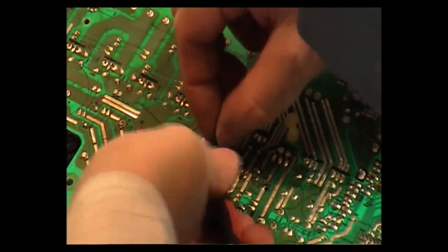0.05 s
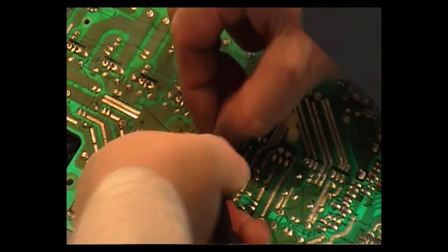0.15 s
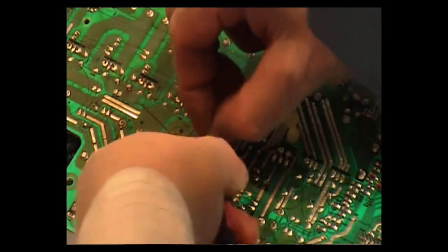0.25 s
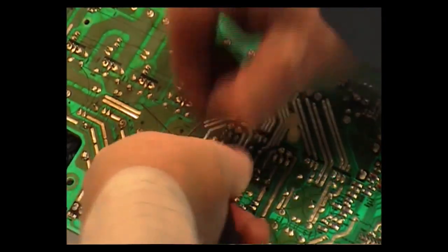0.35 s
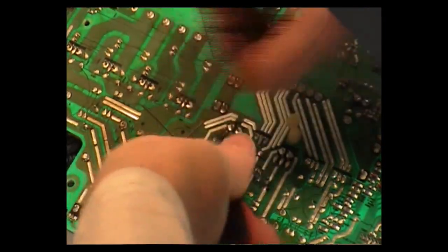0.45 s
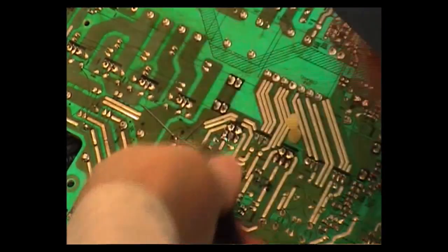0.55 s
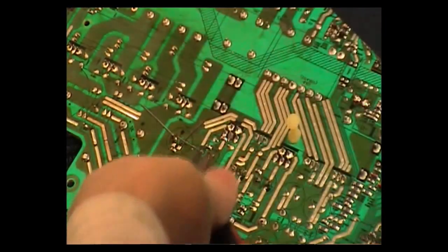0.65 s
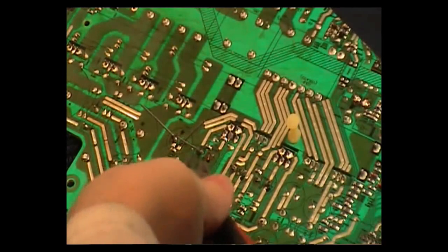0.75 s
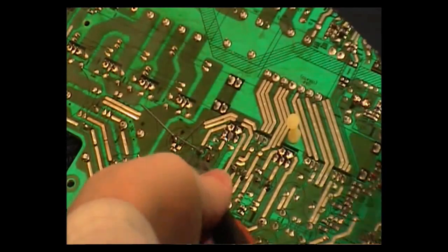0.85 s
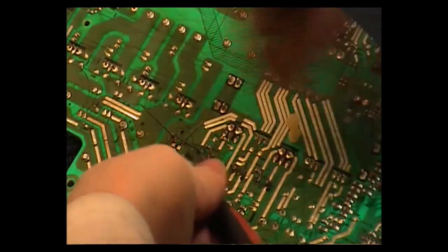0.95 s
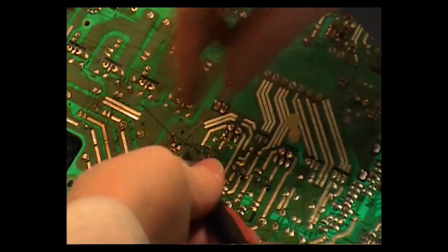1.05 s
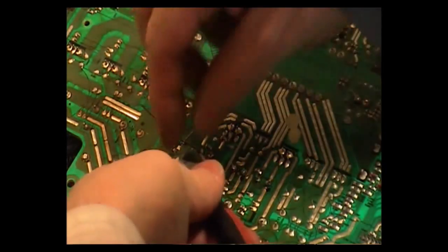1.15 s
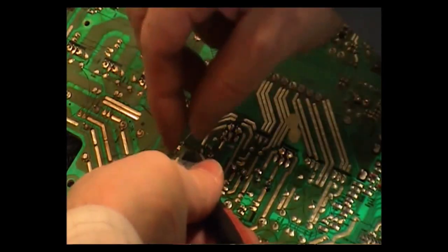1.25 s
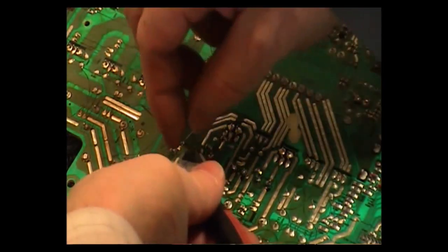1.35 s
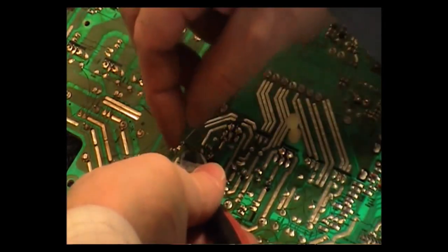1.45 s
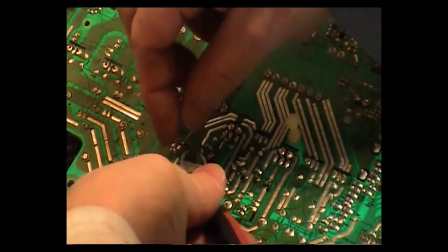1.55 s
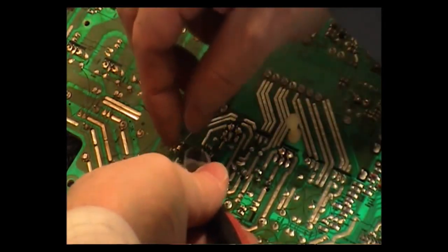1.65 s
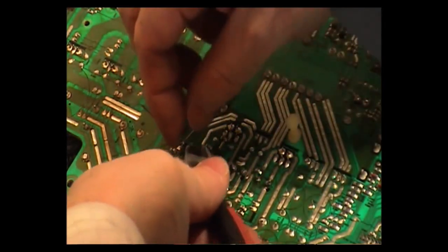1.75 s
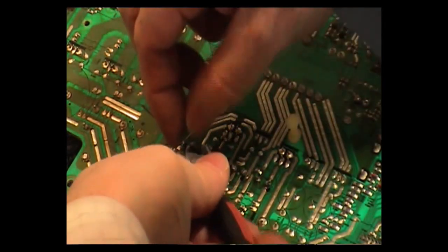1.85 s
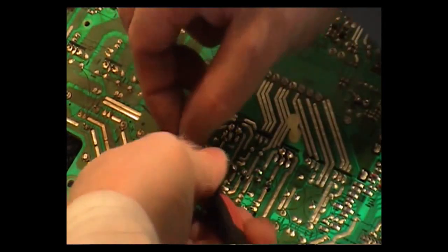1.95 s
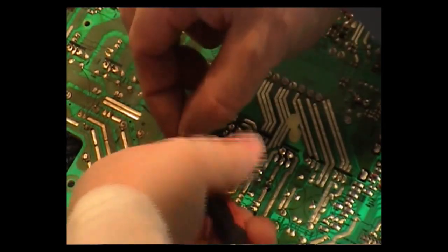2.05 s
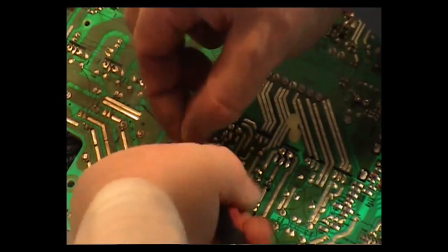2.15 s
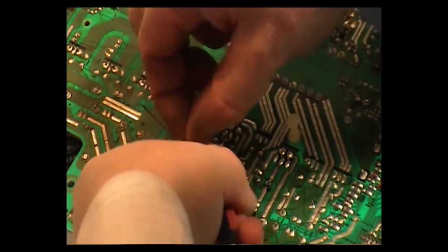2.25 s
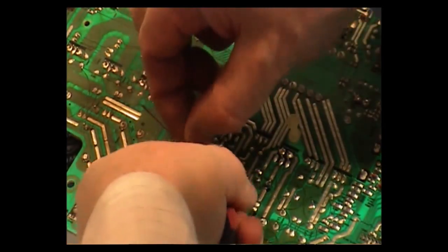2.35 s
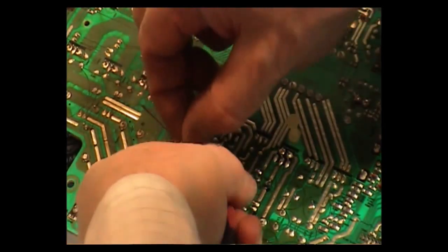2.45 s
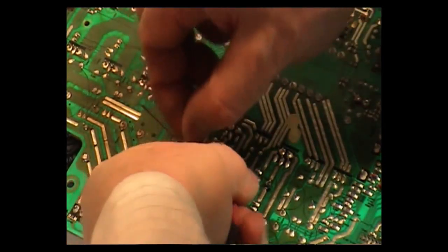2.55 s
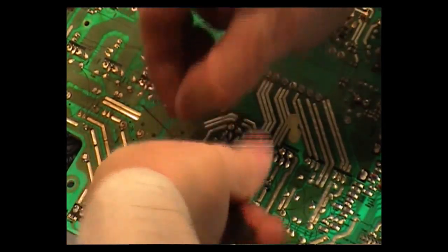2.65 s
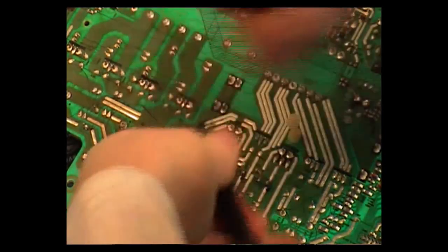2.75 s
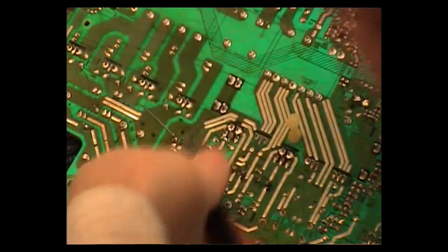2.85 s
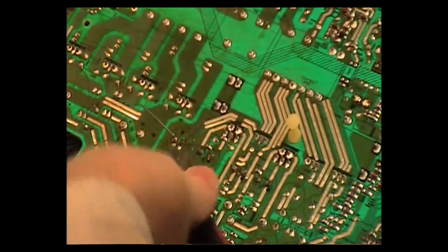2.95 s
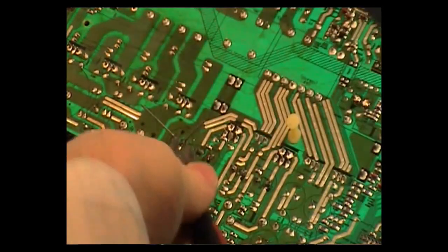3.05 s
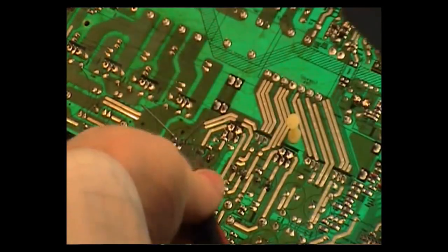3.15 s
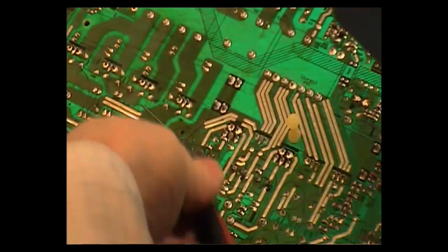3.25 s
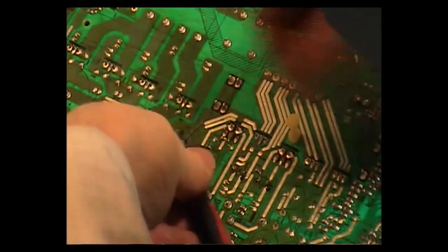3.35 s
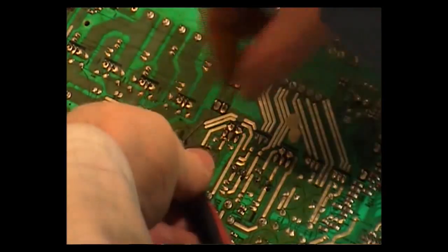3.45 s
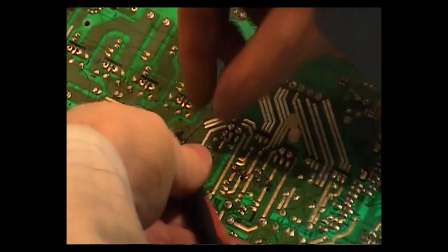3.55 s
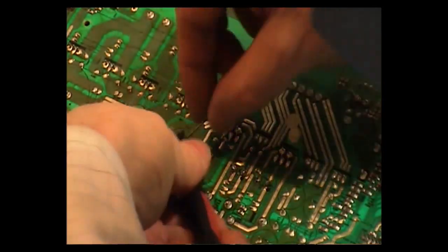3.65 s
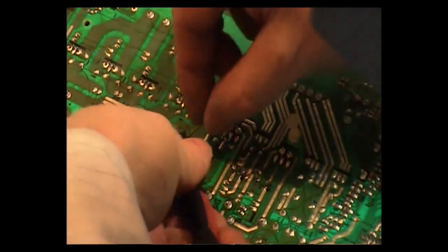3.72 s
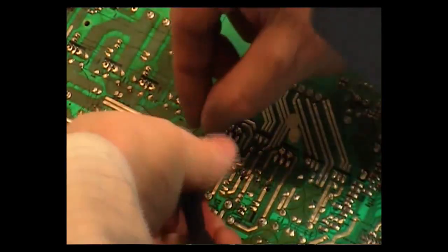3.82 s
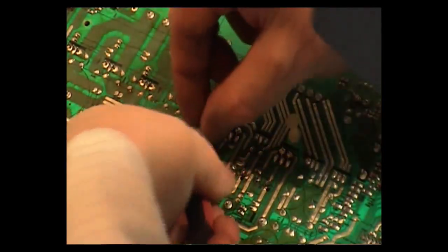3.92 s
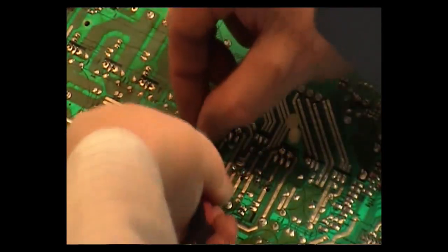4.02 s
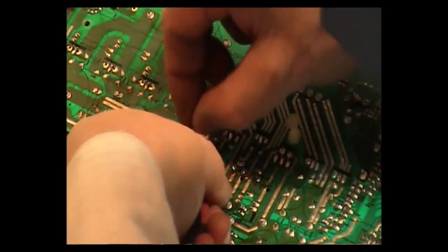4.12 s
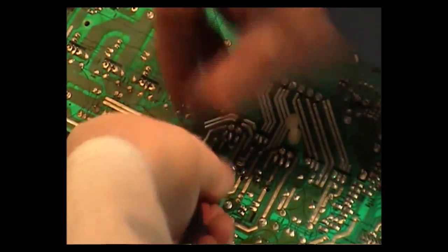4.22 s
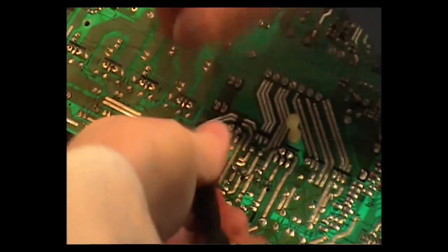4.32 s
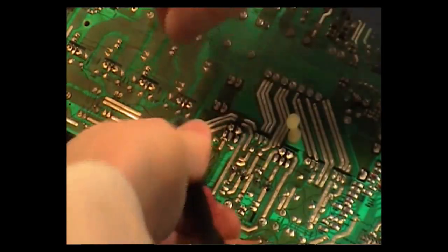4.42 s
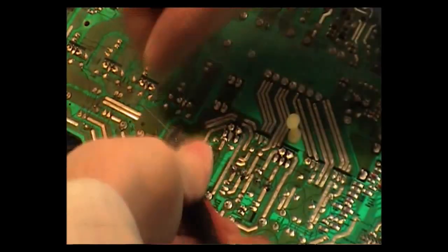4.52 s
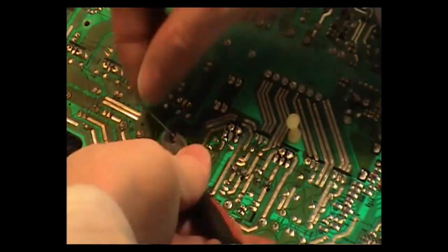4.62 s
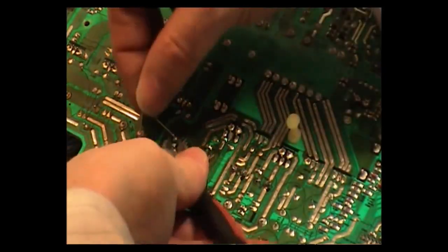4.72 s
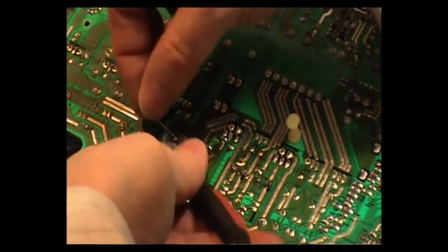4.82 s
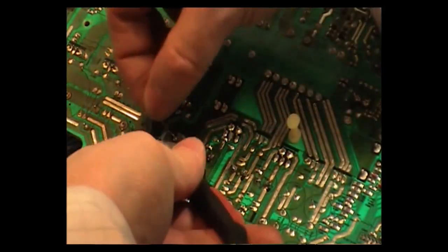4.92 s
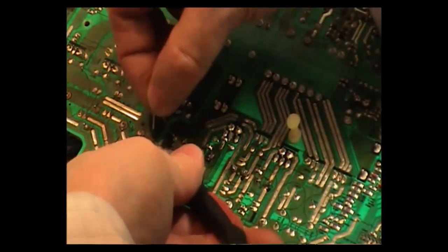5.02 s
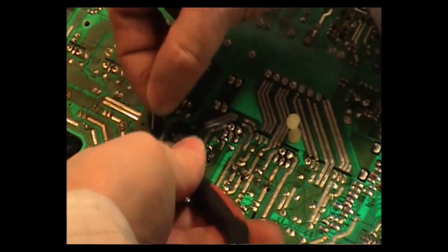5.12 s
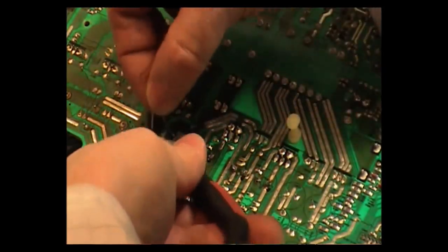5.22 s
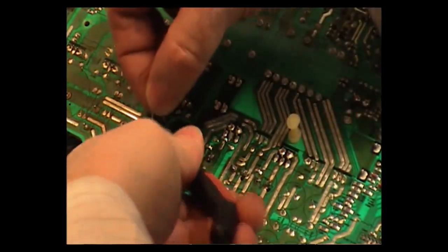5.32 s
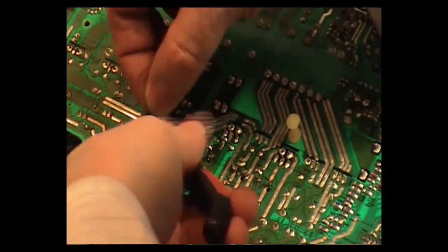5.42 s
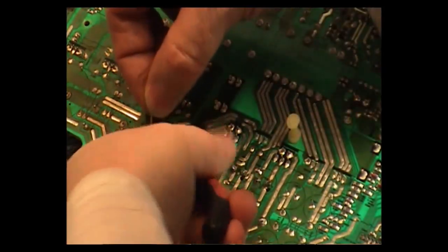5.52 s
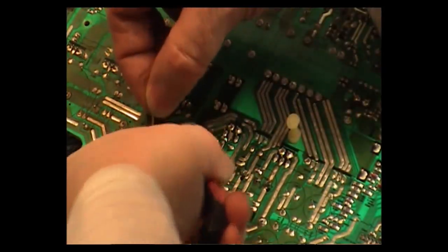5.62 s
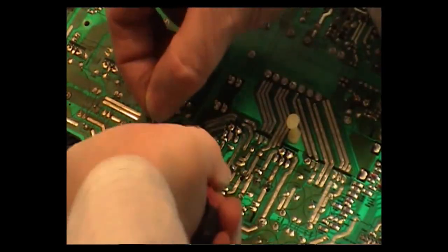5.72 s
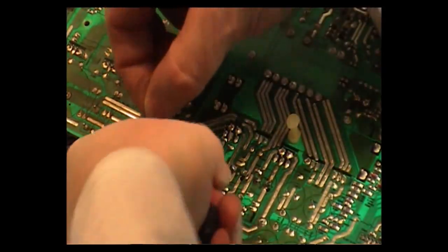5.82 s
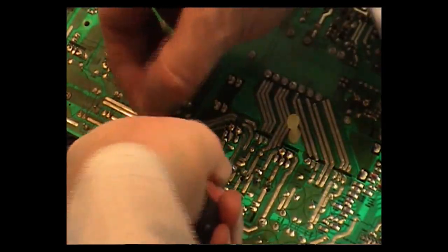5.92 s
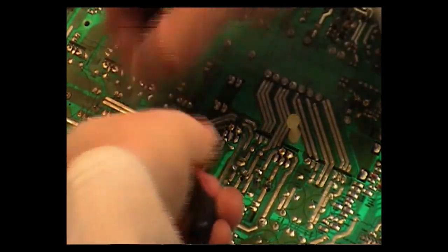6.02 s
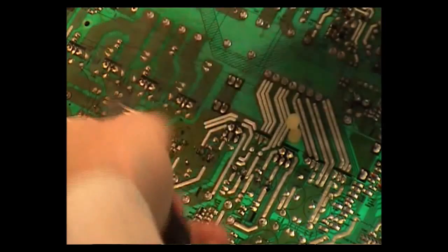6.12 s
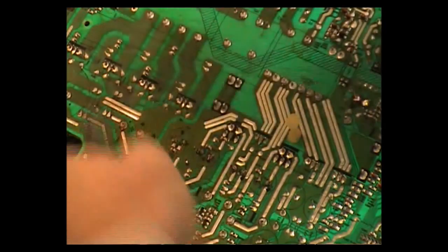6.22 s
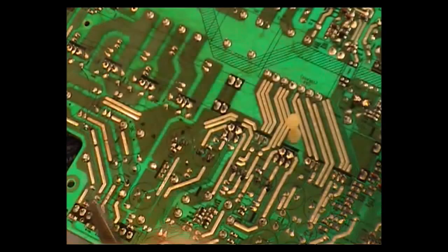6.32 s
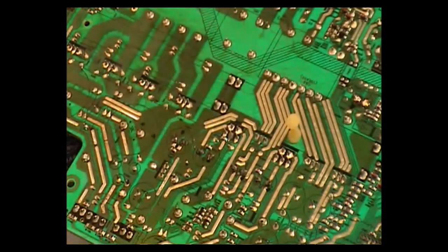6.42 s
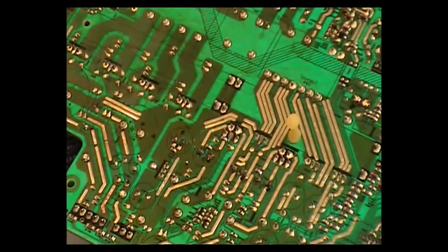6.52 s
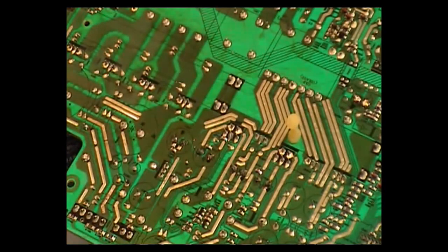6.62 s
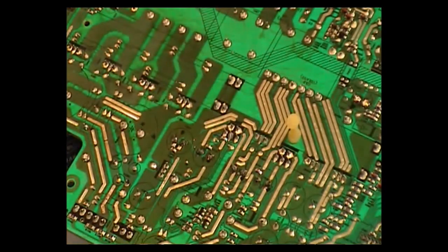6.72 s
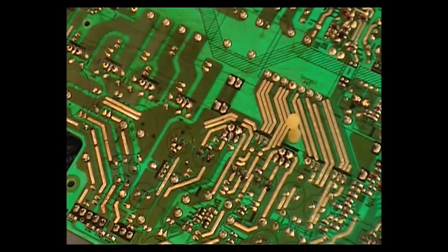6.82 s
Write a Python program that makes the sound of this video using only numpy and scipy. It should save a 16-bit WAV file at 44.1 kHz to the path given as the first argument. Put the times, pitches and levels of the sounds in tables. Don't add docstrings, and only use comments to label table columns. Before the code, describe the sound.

Irregular steel snips and plasticky board knocks sound very near the microphone, with short room reflections. Small ticks and finger taps fill the gaps between a few hard slams and two explosive metallic cracks, one before three seconds and one around six. Afterwards hands brush the board and something squeaks briefly. Low far traffic with a falling engine tone and faint camera hiss lie underneath.

```python
import sys
import numpy as np
from scipy import signal
from scipy.fft import rfft, irfft, next_fast_len
from scipy.io import wavfile
from scipy.ndimage import uniform_filter1d, map_coordinates

SR = 44100
rng = np.random.default_rng(int(sys.argv[2]) if len(sys.argv) > 2 else 0)


def generate_wav(signal):
    frames = np.transpose(np.atleast_2d(signal))
    scaled = np.clip(frames, -1, 1) * 32767
    pcm = np.round(scaled).astype(np.int16)
    wavfile.write(sys.argv[1], SR, pcm)


def volts_from_decibels(level):
    exponent = np.asarray(level, float) / 20
    return 10 ** exponent


N = 302945
SIZE = 5 * 2 ** 12
LEAD = 512
JAW_HZ = 7800
BLUNT_TOP_DB = -11

# start_s, click_db, board_db, tool_db, top_band_db
CUTS = [
    (2.726, -4.5, -30, -27.5, 7),
    (6.0598, -3, -22.5, -24, 0.5),
]
CUT_ROOM_DB = [8, 3]


def cuts():
    s, click, board, tool, top = np.transpose(CUTS)
    table = rows(s, click, board, tool, 7720, 1250, CUT_ROOM_DB, top)
    return contacts(table, bite=.0005, rattle=.004, rattle_db=-15, snap=6)


# start_s, click_db, board_db, tool_db, click_hz
SNIPS = [
    (2.0206, -22.5, -63, -41.5, 6670),
    (2.364, -21.5, -49, -46, 8160),
    (3.6379, -16.5, -49.5, -35, 10500),
    (4.0103, -15.5, -63, -38, 5700),
]


def snips():
    s, click, board, tool, hz = np.transpose(SNIPS)
    table = rows(s, click, board, tool, hz, 990, room_db=0.3, top_db=0.5)
    return contacts(table, bite=0.00028, rattle=0.0048, rattle_db=12.0)


# start_s, board_db, board_hz, click_db, tool_db
SLAMS = [
    (0.4964, -19, 950, -25.5, -33),
    (0.503, -26, 1100, -45, -41),
    (3.7237, -37.5, 1050, -28.5, -39),
    (4.3413, -20, 900, -13, -26),
]


def slams():
    s, board, hz, click, tool = np.transpose(SLAMS)
    top_db = 10.5 + 0.95 * click
    table = rows(s, click, board, tool, JAW_HZ, hz, room_db=-4, top_db=top_db)
    return contacts(table, bite=0.0011, rattle=0.0092, rattle_db=-3.5, snap=4.3, steel_db=-10)


# start_s, click_db, tool_db, click_hz
BOUNCES = [
    (1.2724, -20, -36, 8850),
    (1.2792, -20, -31.5, 7800),
    (1.2838, -22, -34, 7600),
    (1.299, -25.5, -35.5, 4940),
    (1.318, -32, -44, 5400),
    (1.336, -39, -50, 5450),
    (1.362, -42, -58, 8000),
]


def bounces():
    return light_steel(BOUNCES, board_db=-40.5, room_db=0, top_db=-11, rattle=.0022)


# start_s,
# click_db, tool_db, click_hz
TICKS = [(0.1211, -40.5, -75, 7900), (0.1885, -47.5, -74, 7500), (0.319, -65, -59.5, 5000),
         (0.466, -63, -56.5, 5000), (0.667, -43, -70, 8000), (0.6862, -35, -45.5, 10500),
         (0.711, -44, -68, 7900), (0.7204, -38, -61, 7550), (0.7332, -34.5, -47, 8200),
         (1.201, -42, -67, 9770), (1.2135, -43, -71, 7800), (1.3557, -40, -62, 4650),
         (1.3844, -58, -70, 9000), (1.405, -41, -68, 8000), (1.6057, -42.5, -52, 6640),
         (1.7335, -36.5, -43.5, 6500), (1.783, -45, -72, 9900), (1.806, -36.5, -46, 6900),
         (1.8257, -34.5, -65, 6440), (1.8951, -46, -45.5, 6200), (1.9185, -41.5, -71, 7500),
         (1.954, -45, -47, 6400), (2.009, -60, -57, 4500), (2.9664, -36, -42, 9200),
         (3.0077, -43.5, -72, 4800), (3.642, -24, -41, 6100), (3.6674, -30.5, -52, 6960),
         (4.0019, -30, -42, 5500), (4.12, -30, -48, 5760), (4.1895, -41.5, -60, 5740),
         (4.4376, -38, -65, 8100), (4.4852, -40, -48, 8000), (4.5144, -35, -50, 7000),
         (4.5513, -35, -52.5, 7600), (4.7165, -56, -59, 8070), (4.7643, -44, -60, 8500),
         (4.795, -42, -62, 7500), (4.583, -24, -43.5, 8000), (5.379, -64, -66, 7490),
         (6.065, -12, -25, 9500), (6.0718, -20, -46, 9100), (6.3694, -53, -60, 4540),
         (6.8384, -54.5, -73, 7330)]


def ticks():
    return light_steel(TICKS, board_db=-54, room_db=-1, top_db=-9, rattle=.007)


def light_steel(table, board_db, room_db, top_db, rattle):
    s, click, tool, hz = np.transpose(table)
    board = board_db + 0.28 * click
    full = rows(s, click, board, tool, hz, 950, room_db, top_db)
    return contacts(full, bite=0.00012, rattle=rattle, rattle_db=-2, snap=4.5, steel_db=-2)


# start_s, board_db, board_hz, click_db
KNOCKS = [(0.082, -49.5, 580, -45.5), (0.115, -49, 990, -57), (0.6465, -44.5, 674, -44),
          (0.6799, -44, 800, -52), (0.687, -43, 954, -44), (1.043, -45, 523, -49),
          (1.142, -48.5, 910, -42.5), (1.4043, -46, 960, -56), (2.2316, -44.5, 547, -49),
          (2.5533, -45.5, 607, -55), (2.8866, -41.5, 880, -62), (2.9538, -43.5, 600, -58),
          (3.7961, -39.5, 936, -31.5), (4.4929, -45.5, 670, -50), (4.5293, -47.5, 1010, -39),
          (4.84, -41.5, 630, -46), (4.8647, -47, 950, -43.5), (5.1052, -53, 940, -43),
          (5.2499, -40, 1080, -37.5), (5.4515, -54.5, 944, -48), (5.5183, -49, 943, -42.5),
          (6.765, -53, 960, -47)]


def knocks():
    s, board, hz, click = np.transpose(KNOCKS)
    tool = 1.322 * board + 6
    return blunt(rows(s, click, board, tool, JAW_HZ, hz, room_db=0, top_db=BLUNT_TOP_DB))


# start_s, board_db, board_hz
TAPS = [(0.2139, -53.5, 684), (0.2744, -58, 432), (0.4344, -69, 676), (0.6364, -50, 370),
        (0.6545, -45, 676), (0.6614, -45, 560), (1.2144, -41.5, 846), (1.5564, -60, 740), (1.919, -53, 990),
        (2.085, -55.5, 1100), (2.4261, -45.5, 560), (2.4594, -46, 563), (2.6562, -51, 318),
        (3.4876, -51.5, 1695), (3.5504, -49.5, 516), (3.719, -37, 1010), (3.9524, -55, 646),
        (4.9214, -54, 301), (5.3761, -60, 318), (5.9429, -42.5, 620), (5.9772, -42.5, 606),
        (6.274, -42.5, 580), (6.297, -48, 1300), (6.33, -53.5, 800)]


def taps():
    s, board, hz = np.transpose(TAPS)
    return blunt(rows(s, board - 23, board, board - 11.5, JAW_HZ, hz, room_db=0, top_db=BLUNT_TOP_DB))


def blunt(table):
    return contacts(table, bite=0.00069, rattle=0.0079, rattle_db=-2.5, snap=4.1)


def rows(s, click_db, board_db, tool_db, click_hz, board_hz, room_db, top_db):
    columns = s, click_db, board_db, tool_db, click_hz, board_hz, room_db, top_db
    return np.transpose(np.broadcast_arrays(*columns))


# centre_hz, width_hz, level_db
BOARD = [(211, 65, -19.5), (301, 35, -0.5), (499, 80, 2), (626.3, 40.2, 1.5), (775, 87, -1),
         (859, 80, -1.5), (1010, 140, 3), (1169, 61, 4.5), (1432, 140, 1.5), (1730, 52, 1),
         (2223, 200, -9.5)]
TOOL = [(1950, 460, -2.5), (2400, 149.7, 1.5), (2870, 550, 3), (3254, 190, 3), (3850, 510, 4),
        (4430, 120, 2)]
JAWS = [(4650, 710, -2), (6760, 830, -2.5), (7600, 1300, -2.5), (9780, 3350, -1), (12400, 5100, -1),
        (13600, 2000, -1.5), (15800, 2200, -18)]
# delay_s, level_db
ECHOES = [(.00053, -3), (.0032, -14), (.009, -20)]


def contacts(table, bite, rattle, rattle_db, snap=0, steel_db=0):
    out = np.zeros((2, N + SIZE))
    hz, t = np.fft.rfftfreq(SIZE, 1 / SR), np.arange(2048) / SR
    board, tool, jaws = modes(BOARD, hz), modes(TOOL, hz), modes(JAWS, hz)
    echoes = 1 + sum(volts_from_decibels(db) * np.exp(-2j * np.pi * hz * s) for s, db in ECHOES)
    rattle_s = rattle + np.array([[.004], [.0015], [0]])
    rattle_gain = volts_from_decibels(rattle_db + steel_db * np.array([[0], [.5], [1]]))
    force = np.exp(-t / bite) + rattle_gain * np.exp(-t / rattle_s)
    for s, click_db, board_db, tool_db, click_hz, board_hz, room_db, top_db in table:
        chatter = rfft(rng.standard_normal(force.shape) * force + snap * (t == 0), SIZE)
        edge = modes([(click_hz, 0.61 * click_hz, 0)], hz) ** 2 + volts_from_decibels(0.778 * click_db - 7.0)
        spot = modes([(board_hz, 1.0 * board_hz, 0)], hz) ** 2 + volts_from_decibels(0.29 * board_db + 6.5)
        parts = [volts_from_decibels(board_db + 25.0) * struck(board * spot, chatter[0], scatter_db=3.0, blur=16),
                 volts_from_decibels(tool_db + 21.0) * struck(tool, chatter[1], scatter_db=3.0, blur=60),
                 volts_from_decibels(click_db + 10.0) * struck(jaws * edge, chatter[2] * echoes, scatter_db=0.0, blur=190)]
        parts = parts * volts_from_decibels(top_db / (1 + (12000 / (hz + 1)) ** 10))
        straight = sum(part[0] for part in parts)
        blended = np.sqrt(sum(np.abs(part[1]) ** 2 for part in parts))
        out[:, round(s * SR):][:, :SIZE] += heard(straight, volts_from_decibels(room_db) * blended, hz)
    return out[:, LEAD:N + LEAD]


def modes(table, hz):
    return np.array([(-1) ** k * volts_from_decibels(db) * 1j * hz * w / (c * c - hz * hz + 1j * hz * w)
                     for k, (c, w, db) in enumerate(table)])


def struck(shapes, force, scatter_db, blur):
    shapes = shapes * volts_from_decibels(rng.normal(0, scatter_db, (len(shapes), 1)))
    blend = uniform_filter1d(np.sum(np.abs(shapes) ** 2, axis=0), size=blur)
    return np.array([unit(force * shapes.sum(0)), unit(np.sqrt(np.abs(blend)))])


# freq_hz, side_over_mid_db
WIDTH_DIRECT = [(60, -15.5), (110, -22.5), (200, -13), (380, -30.5), (700, -25), (1290, -23), (2380, -11),
                (4400, -10), (8120, -9.5), (15000, 6.5)]


def heard(straight, blended, hz):
    ports = 1 + 1j * volts_from_decibels(along(WIDTH_DIRECT, hz)) * np.array([[1], [-1]])
    path_s = .0006
    late = np.exp(-2j * np.pi * hz * (LEAD / SR + path_s))
    return irfft((straight * ports + blended * room_tail(hz)) * late, SIZE)


# freq_hz, t60_s
ROOM = [(200, 0.36), (1000, 0.26), (4000, 0.36), (8000, 0.32), (14000, 0.21)]
# freq_hz, level_db
ROOM_GAIN = [(300, 2.5), (1000, -2.5), (3500, -1), (8000, -6.5), (14000, -10.5)]
# freq_hz, side_over_mid_db
WIDTH_ROOM = [(60, -13.5), (110, -18.5), (200, -25), (380, -29.5), (700, -21.5), (1290, -17.5),
              (2380, -7.5), (4400, -4), (8120, -5), (15000, 12)]


def room_tail(hz):
    length = SIZE - 4096
    f, t, z = signal.stft(rng.standard_normal((2, length)), SR, nperseg=256)
    decay = volts_from_decibels(-60 * t / along(ROOM, f)[:, None]) * (1 - np.exp(-t / 0.011))
    decay = decay / np.linalg.norm(decay, axis=1, keepdims=True)
    tail = signal.istft(z * decay, SR, nperseg=256)[1][:, :length]
    mid, side = rfft(tail / np.linalg.norm(tail[0]), SIZE) * volts_from_decibels(along(ROOM_GAIN, hz))
    side = side * volts_from_decibels(along(WIDTH_ROOM, hz))
    return np.array([mid + side, mid - side])


def singing():
    dry = (ringing() + creak()) * volts_from_decibels(1.5 * wobble(150))
    tail = irfft(room_tail(np.fft.rfftfreq(SIZE, 1 / SR)), SIZE)
    return dry + volts_from_decibels(-10) * signal.fftconvolve(dry[None], tail, axes=1)[:, :N]


# start_s, pitch_hz,
# level_db, t60_s
RINGS = [(.083, 2163, -48, 0.081), (2.75, 4360, -44, .45), (1.919, 8200, -50, .04),
         (1.2155, 1000, -38, .05), (5.2505, 1100, -43, .08), (5.2505, 3650, -48, .04),
         (2.7265, 7550, 1.5, .006), (2.7293, 7900, -9, 0.011), (6.0605, 7700, -7, .008),
         (4.342, 993, -23, .14), (0.497, 1000, -22, .03), (0.6548, 640, -33, .03), (0.6615, 600, -35, .03),
         (0.6795, 850, -37, .03), (6.6, 4050, -49, 0.36), (.503, 1170, -26, 0.24), (2.732, 1172, -29, 0.32),
         (3.729, 1171, -49, 0.24), (6.066, 1000, -29.5, 0.31), (6.07, 484.3, -31, 0.24),
         (0.6385, 3700, -45, .03), (0.687, 4120, -41, .04), (4.5515, 3800, -40, 0.042),
         (1.273, 3600, -33, 0.077), (1.319, 2900, -38, .05), (1.335, 3900, -39, .05),
         (1.294, 2600, -36.5, 0.16), (1.045, 2700, -52, 0.094), (4.752, 3830, -52, .1),
         (4.764, 3860, -45, 0.09), (4.779, 4400, -44, 0.09), (4.5, 1800, -46.5, 0.05),
         (5.251, 3120, -54.5, 0.32), (7.4, 3260, -45, 0.14)]
# pitch_hz, level_db, t60_s
SPRING = [(1723, 0.5, 0.077), (2000, 2, 0.047), (2433, -8, 0.18), (2654, -11, 0.11)]
# start_s, level_db
PLUCKS = [
    (1.7338, -44.5),
    (1.5, -55),
    (1.606, -56),
]


def ringing():
    t, out = np.arange(SR // 3) / SR, np.zeros(N + SR)
    waver = 0.97 * np.tile(wobble(160), reps=2)
    flutter = np.tile(wobble(350), reps=2)
    loosens = 1 - np.exp(-t / .006)
    plucked = [(s, hz, db + level, t60) for s, db in PLUCKS for hz, level, t60 in SPRING]
    for s, hz, db, t60 in RINGS + plucked:
        i = round(s * SR)
        depth = (hz / 2600) ** 2 / (1 + (hz / 4000) ** 2)
        tone = np.sin(2 * np.pi * hz * t + depth * waver[i:][:len(t)])
        rough_db = 3.5 * min(hz / 3000, 1) ** 2
        tone = tone * volts_from_decibels(rough_db * loosens * flutter[i:][:len(t)])
        rise = 1 - np.exp(-t / min(0.0013, t60 / 30))
        out[i:][:len(t)] += volts_from_decibels(db - 60 * t / t60) * rise * tone
    return out[:N]


# start_s, slip_rate_hz, level_db, loose_resonance_hz
CREAK = [
    (6.568, 570, -50, 653),
    (6.577, 614, -41.5, 650),
    (6.593, 625, -39.5, 1950),
    (6.602, 625, -46.5, 640),
    (6.632, 580, -54, 630),
]
# start_s, pitch_hz, level_db, overtones_db
SLIDE = [
    (6.586, 1890, -62, -6),
    (6.596, 2000, -48, -3),
    (6.603, 2050, -49, -2),
    (6.613, 2600, -46, -25),
    (6.619, 2660, -60, -30),
    (6.624, 4100, -55, -30),
    (6.64, 3500, -52, -30),
    (6.657, 2500, -52, -30),
    (6.663, 2400, -64, -30),
]


def creak():
    on = curves(CREAK, outside=0)[0] > 0
    rate_hz, db, loose_hz = (column[on] for column in curves(CREAK))
    turn = 2 * np.pi * np.cumsum(rate_hz * (1 + 0.017 * wobble(280)[on])) / SR
    order = np.arange(1, 17)[:, None]
    tilt_db = -1.9 * order + 7 * np.exp(-((order * rate_hz - loose_hz) / 300) ** 2)
    tilt_db = tilt_db + 9 * np.exp(-((order * rate_hz - 3950) / 350) ** 2)
    out = np.zeros(N)
    out[on] = volts_from_decibels(db - 4.5) * np.sum(volts_from_decibels(tilt_db) * np.sin(order * turn + 0.64 * order), axis=0)
    glide = 2 * np.pi * np.cumsum(curves(SLIDE)[0]) / SR + 1.0 * wobble(300)
    _, slide_db, over_db = curves(SLIDE, outside=-120)
    overtones = np.sin(2 * glide) + 0.46 * np.sin(3 * glide)
    return out + volts_from_decibels(slide_db) * (np.sin(glide) + volts_from_decibels(over_db) * overtones)


# start_s, length_s, drag_db, bright_over_drag_db, thump_over_drag_db
RUBS = [
    (0.636, 0.089, -43, -13, 1.5),
    (4.456, 0.048, -63, 5, -7),
    (4.522, 0.036, -47, -3.5, 4),
    (4.704, 0.1, -70.5, 11.5, 7),
    (5.92, 0.085, -60, -2.5, -9),
    (6.28, 0.3, -65.5, -1, 0),
    (6.553, 0.07, -56, 4, -29),
    (6.637, 0.034, -48, -4.5, -20),
    (6.704, 0.17, -53, -8, -13),
]
# freq_hz, density_db
DULL = [(47, -24.5), (80, -3), (158, -3), (230, -13.5), (267, 0.5), (668, 4), (2200, -17), (2860, -73),
        (4840, -120)]
BRIGHT = [(1060, -12.5), (1800, 0), (3600, -4), (5600, -6.5), (7600, -7), (10000, -10), (14300, -26),
          (16000, -42)]
THUMP = [(40, -15), (90, -5), (160, -10.5), (260, -4), (450, -45.5)]


def rubbing():
    dull = bright = thump = 0
    for s, length, db, bright_db, thump_db in RUBS:
        gain = volts_from_decibels(db) * swell(s, length, attack=0.028, release_db_per_s=276)
        dull = dull + gain
        bright = bright + volts_from_decibels(bright_db) * gain
        thump = thump + volts_from_decibels(thump_db) * gain
    lumps = unit(volts_from_decibels(0.78 * wobble(40) + 1.0 * wobble(200)))
    grit = unit(volts_from_decibels(2.2 * wobble(320)))
    drag = volts_from_decibels(-2.0) * dull * rush(DULL, WIDTH_ROOM)
    drag = drag + volts_from_decibels(0.5) * bright * grit * rush(BRIGHT, WIDTH_ROOM)
    return lumps * drag + volts_from_decibels(-3.5) * thump * rush(THUMP, WIDTH_ROOM)


# start_s, level_db
TRAFFIC = [
    (0.0, -73.5),
    (0.8, -68),
    (1.18, -74),
    (1.99, -66.5),
    (2.26, -71.5),
    (3.54, -65),
    (3.79, -68),
    (4.55, -62),
    (6.56, -67.5),
    (6.87, -63.5),
]
# start_s, length_s, pitch_hz, level_db
DRONE = [
    (3.048, 1.25, 286.5, -57),
    (4.651, 1.05, 272.5, -54.5),
    (6.146, .8, 239, -56.5),
]
# freq_hz, density_db
RUMBLE = [(22, -7.5), (40, 3), (56, 13), (70, 5), (90, -36.5)]
WASH = [(47, -42.5), (80, -15), (198, -17), (280, -11), (431, -16.5), (543, -16), (704, -18), (1350, -27),
        (2500, -38.5), (3250, -78), (5500, -120)]
# freq_hz, side_over_mid_db
WIDTH_FLOOR = [(60, -26.5), (110, -7.5), (200, -12), (380, -11.5), (700, -7.5), (1290, -3.5), (2380, 3),
               (4400, 2.5), (8120, 0.5), (15000, 3.5)]


def traffic():
    near_db, = curves(TRAFFIC)
    throb = np.sin(2 * np.pi * np.cumsum(57 + 3 * wobble(9)) / SR) * volts_from_decibels(3.8 * wobble(11))
    out = volts_from_decibels(near_db + 2.5) * (1.1 * throb + 0.89 * rush(RUMBLE, WIDTH_FLOOR))
    wash_db = -60.5 + 0.47 * (near_db - near_db.mean())
    out = out + volts_from_decibels(wash_db + 0.77 * wobble(4.3)) * rush(WASH, WIDTH_FLOOR)
    sag_hz_per_s, fade_db_per_s = 13, 6
    for s, length, hz, db in DRONE:
        since = np.arange(N) / SR - s
        turn = 2 * np.pi * np.cumsum(hz - sag_hz_per_s * since + 6 * wobble(25)) / SR
        level = volts_from_decibels(db - fade_db_per_s * np.clip(since, 0, 2) + 2.0 * wobble(30))
        level = level * swell(s, length, attack=0.11, release_db_per_s=300)
        out = out + uniform_filter1d(level, size=900) * (np.sin(turn) + 0.11 * np.sin(turn / 2))
    return out


# pitch_hz, level_db
WHINE = [
    (1437, -75.5),
    (1895, -85.5),
    (4290, -96.5),
]


def whine():
    return sum(volts_from_decibels(db + 2.98 * wobble(6.1)) * np.sin(2 * np.pi * np.cumsum(hz + 4 * wobble(20)) / SR)
               for hz, db in WHINE)


# freq_hz, density_db
HISS = [(710, -38), (1200, -9), (1630, -11), (1780, -14), (1940, -13), (2170, -17), (2730, -19),
        (3660, -17), (11300, -22.5), (15200, -33.5), (16400, -32)]


def hiss():
    dull = signal.butter(10, 15800, fs=SR, output="sos")
    return volts_from_decibels(-68.5) * signal.sosfilt(dull, rush(HISS, WIDTH_FLOOR))


def rush(spectrum, width):
    m = next_fast_len(N)
    hz = np.fft.rfftfreq(m, 1 / SR)
    colour = volts_from_decibels(along(spectrum, hz))
    gains = unit(colour) * [np.ones_like(hz), volts_from_decibels(along(width, hz))]
    mid, side = irfft(rfft(rng.standard_normal((2, m))) * gains, m)[:, :N]
    return np.array([mid + side, mid - side])


def swell(start, length, attack, release_db_per_s):
    t = np.arange(N) / SR - start
    return np.clip(t / attack, 0, 1) ** 2 * volts_from_decibels(-release_db_per_s * np.clip(t - length, 0, 1))


def wobble(rate):
    knots = rng.standard_normal(int(N * rate / SR) + 4)
    return map_coordinates(knots, [np.arange(N) * rate / SR])


def curves(table, outside=None):
    s, *cols = np.transpose(table)
    return [np.interp(np.arange(N) / SR, s, c, outside, outside) for c in cols]


def along(points, hz):
    f, v = np.transpose(points)
    return np.interp(np.log(hz + 1), np.log(f + 1), v)


def unit(x):
    return x / np.sqrt(np.mean(np.abs(x) ** 2) + 1e-20)


def scene():
    impacts = cuts() + snips() + slams() + bounces() + ticks() + knocks() + taps()
    return impacts + singing() + rubbing() + traffic() + whine() + hiss()


def low_pass(x):
    return signal.sosfilt(signal.butter(12, 17490, fs=SR, output="sos"), x)


def record(dry):
    hz = np.fft.rfftfreq(N, 1 / SR)
    dip_db = -2.5 * np.exp(-((hz - 5630) / 1200) ** 2)
    shaded = irfft(rfft(dry) * volts_from_decibels(dip_db), N)
    since = np.clip(np.arange(N) / SR - 2.732, 0, 1)
    duck_db = -11 * (1 - np.exp(-since / .006)) * np.exp(-since / .016)
    ducked = shaded * volts_from_decibels(duck_db)
    ceiling = .84
    limited = ducked / (1 + np.abs(ducked / ceiling) ** 6) ** (1 / 6)
    low = signal.butter(12, 16100, fs=SR, output="sos")
    return low_pass(signal.sosfilt(low, limited))


dry = scene()
out = record(dry)
generate_wav(out)
```